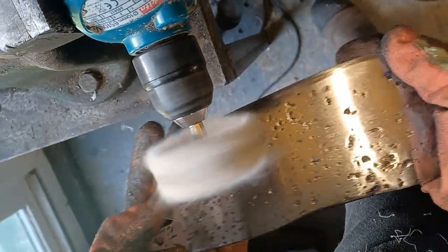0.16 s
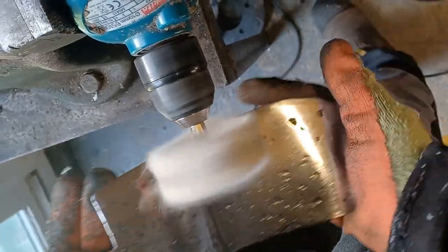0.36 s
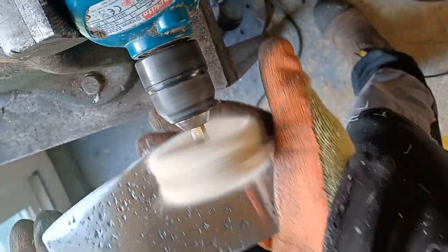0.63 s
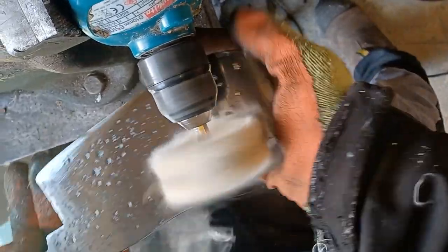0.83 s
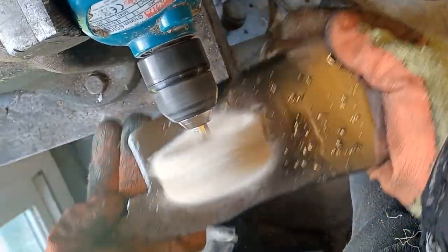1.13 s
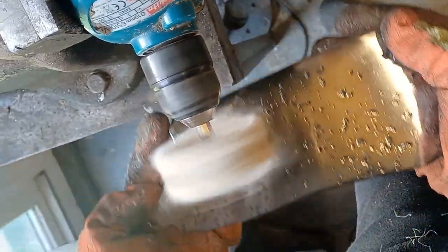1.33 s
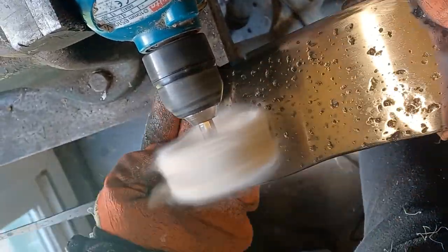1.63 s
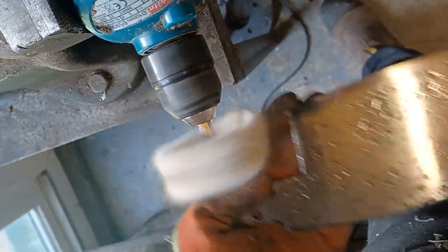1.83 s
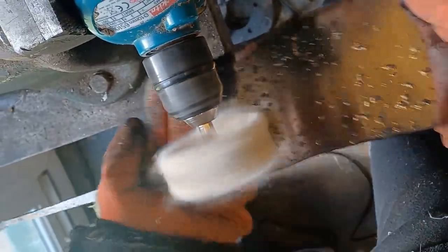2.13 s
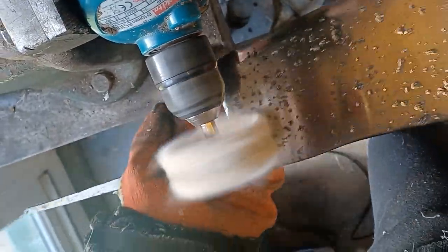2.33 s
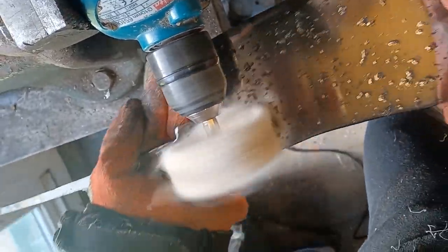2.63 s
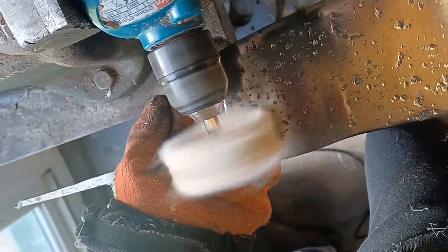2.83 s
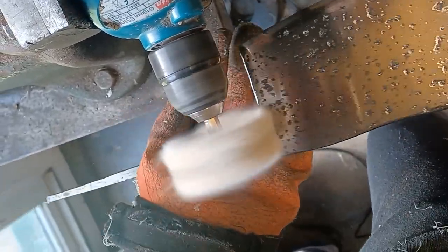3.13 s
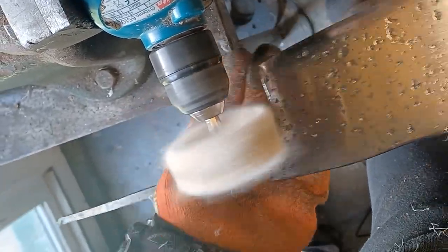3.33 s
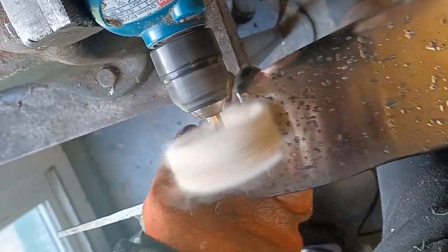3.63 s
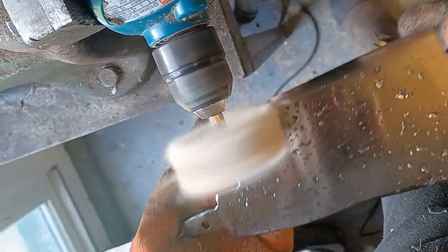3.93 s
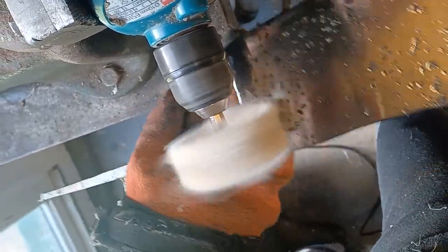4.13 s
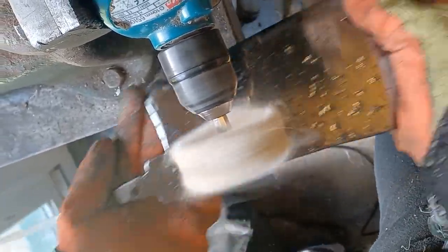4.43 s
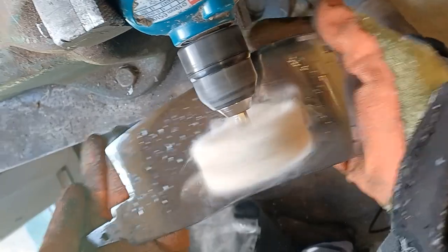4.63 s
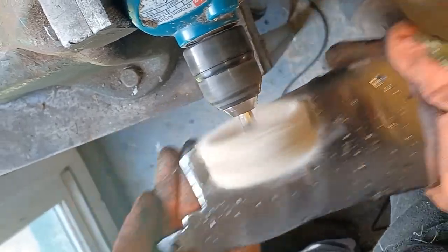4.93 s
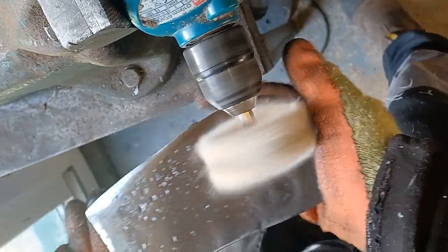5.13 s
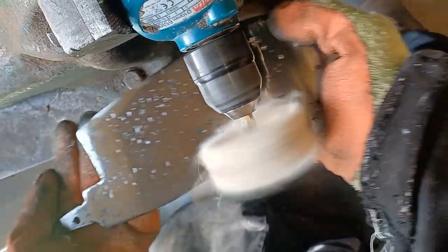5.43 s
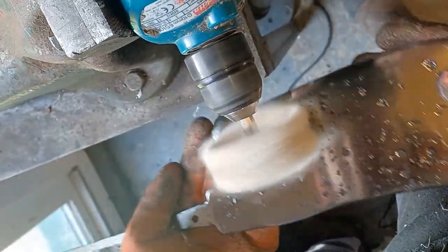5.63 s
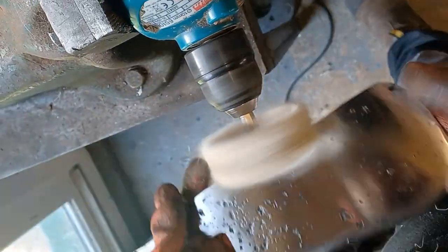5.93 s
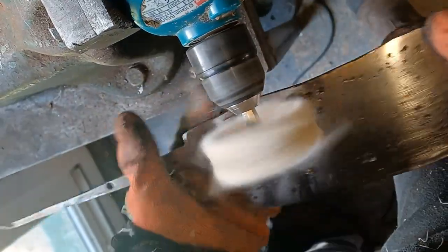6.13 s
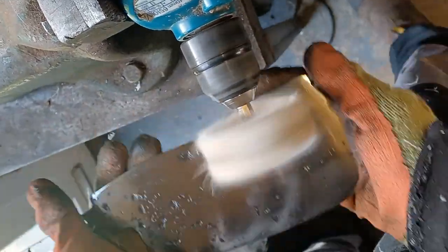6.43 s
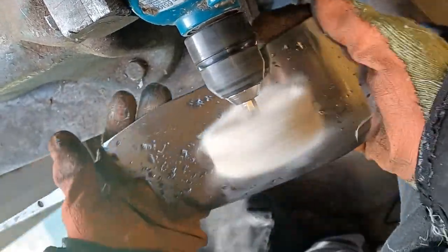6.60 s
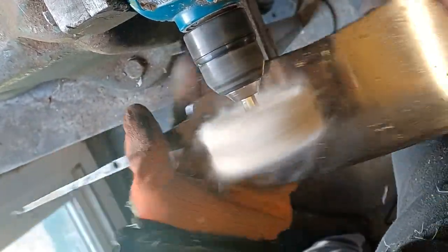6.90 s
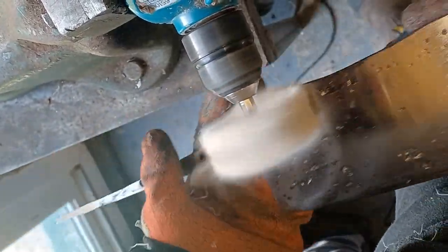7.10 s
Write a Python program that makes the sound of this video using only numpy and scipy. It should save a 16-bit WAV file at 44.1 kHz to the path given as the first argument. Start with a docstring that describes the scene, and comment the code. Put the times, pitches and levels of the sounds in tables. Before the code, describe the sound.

An electric drill whines high over gear roar and hiss, spinning a polishing mop against a steel blade while air buffets the microphone.

```python
"""A high motor whine sings over gear roar and fan hiss: a clamped electric drill spins a cloth
polishing mop against a steel blade, close to a two-port microphone. The pitch sags under load when
the blade is pressed on the mop, and the turning blade reflects the whine unevenly to the two ports.
Turbulent air thrown off by the drill buffets both with rumble, thumps and flutters, the right one
harder until it comes into shelter near the end."""
import sys
import numpy as np
from scipy import signal
from scipy.fft import rfft, irfft, next_fast_len
from scipy.io import wavfile
from scipy.ndimage import uniform_filter1d, map_coordinates

SR = 44100
rng = np.random.default_rng(int(sys.argv[2]) if len(sys.argv) > 2 else 0)


def log_audio(samples):
    """Write samples as a 16-bit WAV file to the path given in sys.argv[1]."""
    # one column per channel
    frames = np.atleast_2d(samples).T
    # limit to full scale, then quantise
    limited = np.clip(frames, -1, 1)
    pcm = np.round(limited * 32767).astype(np.int16)
    wavfile.write(sys.argv[1], SR, pcm)


N = 320166

# Motor speed, sagging under the blade's load. Each row: time in seconds, whine pitch in Hz.
MOTOR_PITCH = [(0.0, 7165), (0.19, 7135), (0.49, 7220), (0.89, 7204), (1.06, 7150), (1.27, 7160),
               (1.45, 7072), (1.59, 7098), (1.72, 7078), (1.8, 6970), (1.866, 6640), (1.89, 6620),
               (2.0, 7050), (2.07, 7180), (2.22, 7200), (2.37, 7150), (2.58, 7064), (2.8, 7068),
               (2.96, 7040), (3.332, 7034), (3.365, 6880), (3.45, 6805), (3.47, 6740), (3.54, 6925),
               (3.6, 6920), (3.635, 6848), (3.68, 6908), (3.73, 6862), (3.76, 6868), (3.84, 6945),
               (3.9, 7055), (3.96, 7140), (4.01, 7184), (4.11, 7180), (4.22, 7204), (4.42, 7146),
               (4.65, 7192), (4.76, 7114), (4.96, 7086), (5.18, 7204), (5.36, 7218), (5.54, 7204),
               (5.7, 7238), (5.92, 7370), (6.14, 7412), (6.42, 7292), (6.53, 7268), (6.77, 7116),
               (6.95, 7146), (7.12, 7136), (7.26, 7084)]
def motor_phase():
    """Phase is the integral of frequency; the rotor's inertia rounds every change of speed."""
    pitch = uniform_filter1d(curves(MOTOR_PITCH)[0], size=1000)
    return 2 * np.pi * np.cumsum(pitch) / SR


# The whine's fundamental. Each row: time in seconds, left and right level in dB.
WHINE_LEVEL = [(0.0, -28.0, -26.0), (0.1, -29.0, -24), (0.27, -26, -20.5), (0.34, -32.5, -20.5),
               (0.5, -25, -20.0), (0.66, -35, -20), (0.74, -45.0, -23), (0.86, -45.0, -19),
               (0.9, -44.5, -23), (0.96, -35, -21), (1.29, -23, -17), (1.38, -28, -21), (1.66, -25, -17.5),
               (1.78, -30, -17.5), (1.87, -22, -28), (2.05, -38, -19), (2.11, -31, -21),
               (2.19, -24.5, -21.5), (2.36, -34.0, -14), (2.45, -31.5, -26), (2.53, -30.0, -14.5),
               (2.62, -29, -21.0), (2.87, -38, -21), (2.92, -42.5, -17.5), (3.08, -32, -18),
               (3.3, -28, -20.5), (3.4, -28, -22), (3.48, -27, -20), (3.56, -27, -24), (3.75, -30.5, -22),
               (3.81, -31, -20), (3.87, -37, -18.5), (4.08, -27, -18), (4.55, -55, -16.0),
               (4.7, -33.5, -18), (4.78, -48, -20.5), (4.96, -25, -16.5), (5.16, -39, -20.0),
               (5.39, -26.5, -17), (5.45, -24.5, -18.5), (5.54, -34.0, -16), (5.87, -24.5, -16),
               (6.07, -36.0, -24), (6.14, -26, -22), (6.31, -21, -14.5), (6.6, -40, -15.5),
               (6.67, -41.5, -19), (6.79, -28, -28), (6.9, -39, -32), (7.01, -24, -23), (7.15, -30, -26),
               (7.26, -25, -22)]
# Its octave. Each row: time in seconds, left and right level in dB.
OCTAVE_LEVEL = [(0.0, -30, -19), (0.35, -24.5, -24.5), (0.51, -31.5, -23.5), (0.73, -24.0, -24),
                (0.93, -28.5, -21), (1.0, -23.5, -25.0), (1.09, -29.5, -23.0), (1.22, -23.0, -24),
                (1.45, -25, -26), (1.52, -36, -36), (1.63, -24, -38.5), (1.71, -29, -27), (2.44, -24, -24),
                (2.55, -27.0, -26), (2.85, -30.5, -25), (2.97, -27, -27), (3.29, -26, -27),
                (3.58, -29, -27), (3.69, -35, -22), (3.88, -27, -27), (4.02, -28.0, -21), (4.17, -25, -27),
                (4.38, -24, -26), (4.66, -34.5, -26.0), (4.77, -28, -27), (4.88, -27, -29.5),
                (5.06, -32.5, -27.0), (5.3, -27, -33), (5.38, -27, -45.0), (5.45, -30.0, -45.0),
                (5.49, -29, -36.0), (5.79, -27.5, -27.0), (5.87, -29.0, -36.0), (5.93, -30.5, -26),
                (6.14, -28.5, -35.0), (6.22, -35.5, -29.0), (6.34, -36.5, -27.0), (6.4, -30.5, -28.0),
                (6.49, -34.5, -33.0), (6.56, -32.5, -25.0), (6.64, -28.5, -30.5), (6.88, -28, -27.0),
                (6.98, -31.5, -30.5), (7.14, -25, -25.0), (7.26, -28.0, -26.5)]
# Phase lead of the right port. Each row: time in seconds, whine and octave lead in radians.
RIGHT_LEAD = [(0.0, 2.6, 2), (0.85, 2.4, 2.1), (1.0, 4.1, 2), (1.35, 4.1, 2.2), (1.5, 2.9, 2.4),
              (1.76, 3.1, 1.3), (1.87, 5.2, 1.6), (2.0, 3.4, 1.1), (2.2, 0.5, 2.1), (2.4, 3.1, 1.4),
              (3.4, 3.4, 1.2), (3.8, 3.8, 0.5), (3.9, 7.3, 0.7), (4.4, 5, 1.3), (4.9, 2.6, 0),
              (5.2, 5.8, -0.3), (5.9, 6.8, 0.3), (6.6, 6.3, 0.6), (6.8, 3.8, .6), (6.92, 7.2, 1.4),
              (7.12, 7.3, 1.2), (7.26, 8.8, 1)]
def whine(phase):
    """Reflection off the moving blade changes the path to each port, shifting level and phase."""
    whine_lead, octave_lead = curves(RIGHT_LEAD) + [[.4], [.25]] * wobble(5.8)
    whine_db = curves(WHINE_LEVEL) - 0.44 * wobble(11)  # the tones waver as the hands move
    octave_db = curves(OCTAVE_LEVEL) + 2 * wobble(11)
    fundamental = tone(whine_db + 1.6 * wobble(30), phase + [[0], [1]] * whine_lead)
    octave = tone(octave_db + 1.6 * wobble(30), 2 * phase + [[0], [1]] * octave_lead)
    return fundamental + octave


# Weaker rotor and gear tones. Each row: multiple of the whine's pitch, left and right level in dB.
ROTOR_ORDERS = [(0.125, -53, -55), (0.25, -47, -48), (0.3225, -44, -49), (0.645, -49, -44),
                (0.75, -53, -52), (0.875, -47, -46), (0.897, -52, -51), (0.9675, -53, -41),
                (1.176, -53, -46), (1.2195, -49, -45), (1.29, -52, -45), (1.4275, -53, -45),
                (1.5, -46, -48)]
# The gear tone just above the whine. Each row: time in seconds, left and right level in dB.
GEAR_TONE_LEVEL = [(0, -48, -40), (1.3, -47, -41), (1.6, -45, -26), (2.1, -47, -42), (2.6, -44, -31),
                   (3.35, -43, -32), (3.6, -51, -42), (5, -48, -43), (7.26, -48, -44)]
def rotor_and_gear_tones(phase, gear_order=1.1975):
    """Parts geared together vibrate at constant multiples, or orders, of the motor's speed."""
    tones = np.zeros((2, N))
    for order, *db in ROTOR_ORDERS:
        level_db = np.array(db)[:, None] + 2.2 * wobble(3.5)
        tones += tone(level_db, order * phase + 1.4 * wobble(1.49))
    gear_db = curves(GEAR_TONE_LEVEL) + 1.9 * wobble(5.05)
    return tones + tone(gear_db, gear_order * phase + 0.85 * wobble(1.66))


# The aliased harmonic, which comes and goes. Each row: time in seconds, level in dB.
ALIAS_LEVEL = [(0, -46), (.18, -39), (.33, -48), (.5, -42), (.85, -39), (1, -52), (1.33, -50), (1.42, -41),
               (1.68, -40), (1.8, -54), (2.1, -52), (2.23, -41), (2.4, -52), (2.78, -50), (2.86, -41),
               (3.02, -38), (3.12, -52), (3.95, -52), (4.15, -41), (4.35, -48), (4.55, -43), (4.75, -52),
               (5.4, -50), (5.6, -42), (6.1, -42), (6.4, -47), (6.7, -46), (6.9, -39), (7.1, -40),
               (7.26, -48)]
def aliased_harmonic(phase, converter_hz=48000):
    """Aliasing: harmonic five exceeds half the converter's rate and folds down, rising as the whine sags."""
    folded_phase = 2 * np.pi * converter_hz * np.arange(N) / SR - 5 * phase
    return tone(curves(ALIAS_LEVEL) + 1.5 * wobble(9.9), folded_phase)


# Machine noise as the blade is turned. Each row: time in seconds, base level of roar and of hiss in dB.
NOISE_LEVEL = [(0.0, -27.5, -26.5), (0.3, -28.5, -25.5), (0.9, -27.5, -26), (1.27, -28, -26),
               (1.6, -27, -25), (1.87, -28, -25), (2.04, -28.5, -27.5), (2.25, -27.5, -25),
               (2.7, -27.5, -25.5), (3.05, -27, -24), (3.6, -28, -24), (3.96, -28, -26), (4.22, -26.5, -25),
               (4.47, -28.5, -25.5), (4.9, -27.5, -25), (5.49, -25.5, -23), (5.74, -27.5, -25.5),
               (5.96, -28, -27.5), (6.12, -26.5, -24.5), (6.26, -27, -26), (6.7, -27.5, -24.5),
               (7.26, -28, -26)]
# Spectrum of the gear roar. Each row: frequency in Hz, left and right relative gain in dB.
ROAR_SPECTRUM = [(300, -38, -26), (870, -21, -17), (1530, -4, -5.5), (1740, -0.5, 0), (2060, 1, -0.5),
                 (2520, 0.5, 2), (3100, 1, -2.5), (3520, -1.5, -2), (4100, -1, 3.5), (4960, 1, 0),
                 (5900, -7, 2), (6740, -6, -9), (8100, -22.5, -12.5)]
# Spectrum of the fan hiss. Each row: frequency in Hz, left and right relative gain in dB.
HISS_SPECTRUM = [(4530, -24, -38.5), (5780, -9, -9.5), (6740, 2, 2), (6620, 2.5, 6), (7620, 0, 2.5),
                 (8300, -2, 1.5), (9000, 1.5, 1), (9750, 4, 0), (10640, -2, 1.5), (11700, -1, -3.5),
                 (12700, -1.5, -4.5), (13500, -2, -5.5), (14300, 0.5, -1.5), (15500, -7, -8),
                 (17000, -19, -12)]
def gear_roar_and_fan_hiss():
    """Broadband noise from gears and cooling fan is stronger at the right port, which faces the drill."""
    roar_db, hiss_db = curves(NOISE_LEVEL)
    shake_db = 0.36 * wobble(9, channels=1)  # unsteady hands move both levels together
    roar_gain = amp(roar_db + [[0], [3]] + shelter(-1) + 0.33 * wobble(4.7) + shake_db)
    hiss_gain = amp(hiss_db + [[1.8], [6]] + shelter(-3.5) + 0.52 * wobble(6.2) + shake_db)
    roar = roar_gain * textured_noise(ROAR_SPECTRUM, correlation=0.34, patch_db=0.27, rib_db=2.5)
    hiss = hiss_gain * textured_noise(HISS_SPECTRUM, correlation=0.033, patch_db=1.3, rib_db=1.5)
    return roar + hiss


# The machine's rush. Each row: time in seconds, level in dB.
RUSH_LEVEL = [(0, -31), (.7, -36.5), (1.4, -37), (2.1, -42), (2.7, -38), (3.5, -46), (4.4, -36.5),
              (5.2, -48), (6, -54), (6.6, -41), (6.85, -38.5), (7.26, -38)]
# Its spectrum. Each row: frequency in Hz, left and right relative gain in dB.
RUSH_SPECTRUM = [(150, -31, -29), (400, 3, -12), (800, -2, -2), (1420, -9, -2.5), (2200, -14, -19),
                 (8000, -48, -54)]
def machine_rush():
    """A band of noise in the lower midrange swells and ebbs by slow amplitude modulation."""
    noise = textured_noise(RUSH_SPECTRUM, correlation=0.4, patch_db=2.3, rib_db=2.5)
    return amp(curves(RUSH_LEVEL)) * noise


# The steady stream of air on the right port. Each row: time in seconds, level in dB.
RIGHT_STREAM = [(0.0, -21), (0.3, -20.5), (0.37, -18.5), (0.5, -18.5), (0.6, -17.5), (0.74, -18),
                (0.8, -20), (1.08, -20), (1.17, -18.5), (1.23, -21), (1.62, -19), (1.71, -21), (1.91, -21),
                (1.98, -15), (2.05, -19), (2.3, -20.5), (2.48, -19), (2.55, -24.5), (2.63, -20),
                (2.76, -22.5), (3.22, -21.5), (3.38, -24), (3.43, -19.5), (3.52, -22), (3.59, -20.5),
                (3.83, -20.5), (3.9, -22), (4.17, -19.5), (4.24, -21.5), (4.31, -18), (4.49, -23.5),
                (4.54, -18.5), (4.6, -25), (4.66, -20.5), (4.8, -25), (4.88, -21.5), (5.06, -23.5),
                (5.15, -21.5), (5.22, -22), (5.38, -19), (5.52, -21.5), (5.555, -19), (5.59, -25),
                (5.63, -20), (5.69, -22), (5.74, -21), (5.79, -25), (5.84, -20), (5.92, -23), (5.96, -19),
                (6.01, -23.5), (6.12, -19.5), (6.22, -21), (6.31, -19.5), (6.35, -23), (6.39, -17),
                (6.44, -21), (6.49, -19.5), (6.72, -21.5), (7.26, -29)]
# Port response, with two cavity humps. Each row: frequency in Hz, left and right relative gain in dB.
PORT_SPECTRUM = [(20, -47, -48), (45.3, -48, -63), (93.4, -22.5, -21), (160.6, -1.5, -3.5), (244, 2, 2),
                 (370, -3, -4), (450, 1, 1), (602, -1.5, -7), (970, -13.5, -17.5), (1570, -12.5, -21),
                 (3000, -30.5, -26.5), (8000, -17, -35.5)]
def buffeting(calm_left_db=-38):
    """Turbulent pressure excites the port cavities: large eddies rumble, small ones flutter."""
    large, small = eddies(), eddies()
    pressure = small + uniform_filter1d(large - small, size=60)  # lows from large, highs from small
    stream = unit(coloured(pressure, PORT_SPECTRUM))
    steady = amp([np.full(N, calm_left_db), curves(RIGHT_STREAM)[0]] + shelter(-16.5))
    unsteadiness = amp([[1.5], [.8]] * wobble(12) + 0.94 * wobble(36))
    return (steady + gusts()) * unsteadiness * stream


def eddies(sharp_per_s=60, sharp_db=4, sharp_s=0.0031, ceiling=2.9):
    """Turbulence is intermittent: noise comes in smooth lumps and sudden bursts of limited strength."""
    lumps = amp(0.7 * wobble(25) + 2.8 * wobble(160))
    arrivals = rng.random((2, N)) < sharp_per_s / SR
    window = np.hanning(round(sharp_s * SR))[None]
    bursts = amp(sharp_db) * signal.fftconvolve(arrivals, window, 'same', axes=1)
    return ceiling * np.tanh((lumps + bursts) / ceiling) * rng.standard_normal((2, N))


# Gusts on a sheltered port. Each row: start and length in seconds, port (0 left, 1 right), level in dB.
GUST_EVENTS = [(0.03, 0.4, 0, -30), (0.5, 0.097, 0, -33), (0.655, 0.28, 0, -27), (0.96, 0.064, 0, -21),
               (1.135, 0.34, 0, -26.5), (1.508, 0.36, 0, -31), (2.013, 0.51, 0, -26.5),
               (2.514, 0.15, 0, -38), (2.89, 0.25, 0, -31), (3.177, 0.19, 0, -27), (3.522, 0.11, 0, -32),
               (3.842, 0.16, 0, -27.5), (4.03, 0.42, 0, -23.5), (4.49, 0.13, 0, -35), (4.675, 0.13, 0, -33),
               (4.79, 0.091, 0, -24), (4.92, 0.051, 0, -25), (5.12, 0.2, 0, -33), (5.295, 0.13, 0, -24),
               (5.557, 0.11, 0, -26.5), (5.702, 0.12, 0, -38), (5.812, 0.12, 0, -25),
               (5.95, 0.22, 0, -28.5), (6.26, 0.043, 0, -18), (6.571, 0.074, 0, -19), (6.695, 0.14, 0, -32),
               (6.855, 0.085, 0, -22), (7.004, .26, 0, -28), (6.872, 0.066, 1, -26),
               (7.005, 0.082, 1, -24.5), (7.118, 0.046, 1, -19), (7.208, 0.043, 1, -26)]
def gusts(edge_s=0.087):
    """The pressure envelope of each gust rises and falls as the square of a linear ramp."""
    envelope = np.zeros((2, N))
    for start, length, port, db in GUST_EVENTS:
        first = max(round((start - edge_s / 2) * SR), 0)
        last = min(round((start + length + edge_s / 2) * SR), N)
        t = np.arange(first, last) / SR
        ramp = np.clip(np.minimum(t - start, start + length - t) / edge_s + .5, 0, 1)
        envelope[round(port), first:last] += amp(db) * ramp ** 2
    return envelope


# Single strong eddies. Each row: time in seconds, port (0 left, 1 right), relative level in dB.
THUMP_EVENTS = [(.174, 1, 0), (.237, 0, -4), (.359, 1, 9.5), (0.384, 1, 3), (.416, 0, -2), (0.543, 1, -4),
                (.613, 1, 2), (0.805, 0, -3), (.84, 1, 8.5), (1.045, 1, 0), (1.152, 1, 2), (1.303, 1, 1),
                (1.376, 1, 1), (1.478, 1, 5), (1.6, 1, 2), (1.85, 1, 10), (2.098, 1, 3), (2.154, 1, 7),
                (2.217, 1, 3), (2.432, 0, 1), (2.445, 1, -4), (2.456, 1, 1), (2.476, 1, 8), (2.505, 1, 6),
                (2.579, 1, 5), (2.647, 1, 8.5), (2.684, 1, 2), (2.933, 1, 3), (3.0, 1, 7), (3.229, 0, -4),
                (3.3, 1, 4.5), (3.425, 1, 5), (3.568, 1, 8.5), (3.836, 1, 7), (3.933, 1, 6), (4.063, 1, 4),
                (4.245, 0, 0.5), (4.312, 1, -3), (4.4, 1, 6), (4.435, 1, 4), (4.465, 1, 2), (4.556, 1, -3),
                (4.693, 1, -1), (4.816, 0, -5), (5.143, 1, 5.5), (5.387, 1, 6), (5.457, 1, 2),
                (5.552, 1, 3), (5.62, 1, 3), (5.71, 1, 7), (5.751, 1, 4), (5.797, 1, 0), (5.847, 1, -1),
                (5.889, 0, -1), (5.955, 1, -1), (6.107, 1, 5), (6.19, 1, 2), (6.282, 0, -9),
                (6.381, 1, 2.5), (6.466, 1, -1), (6.488, 1, 1.5), (6.557, 1, -1), (6.602, 0, -9),
                (6.649, 1, -1), (6.708, 1, -8), (7.025, 0, -2)]
# Their spectrum, crisper than the stream's. Each row: frequency in Hz, left and right gain in dB.
THUMP_SPECTRUM = [(20, -48, -45), (90.5, -20, -19), (234, 8, -0.5), (500, -1, 0), (980, -5, -11),
                  (1800, -9, -22), (4000, -33, -36)]
def thumps():
    """A strong eddy draws an impulse response from the port: a dip in pressure, then a push."""
    impulses = np.zeros((2, N))
    for time, port, db in THUMP_EVENTS:
        impulses[round(port), round((time - .0015) * SR)] = -amp(db + 19.0)
    return coloured(impulses, THUMP_SPECTRUM)


# Short flutters on the ports. Each row: centre in seconds, relative level in dB, pitch in Hz,
# left over right in dB, half-width in milliseconds.
FLUTTER_EVENTS = [(.418, -17, 770, -20, 1.6), (.918, -16, 680, -20, 1.6), (.948, -17.5, 890, -22, 1.6),
                  (1.001, -20, 760, -20, 1.6), (1.177, -22, 1150, -22, 1.5), (1.254, -19, 1340, 14, 1.4),
                  (1.266, -30, 650, -18, 1.6), (1.537, -23, 700, -20, 1.6), (1.849, -20, 620, -15, 1.3),
                  (2.089, -25, 810, 14, 1.6), (2.196, -21, 710, -20, 1.6), (2.212, -19, 900, 14, 1.7),
                  (2.407, -18, 700, -20, 1.6), (2.503, -22, 883, -14, 1.6), (2.718, -20, 780, -20, 1.6),
                  (3.179, -20, 680, -21, 2), (3.227, -12.5, 770, -10, 1.9), (3.469, -20, 810, -22, 1.6),
                  (3.662, -19, 750, -20, 1.8), (3.701, -22, 900, -23, 2), (4.168, -22, 920, 14, 1.6),
                  (4.203, -17, 740, -20, 1.6), (4.229, -19, 780, 16, 1.6), (4.39, -20, 860, 14, 1.8),
                  (5.549, -14, 590, -13, 2.6), (5.796, -25, 620, -20, 1.6), (5.949, -22, 850, -22, 1.6),
                  (6.04, -8.5, 655, -19, 1.2), (6.351, -23, 650, -22, 1.8), (6.648, -22, 750, -20, 1.6),
                  (6.893, -42, 50, -13, 8), (7.047, -22, 810, 17, 1.6)]
def flutters():
    """Each flutter is a wave packet: a sine that swells and fades under a Gaussian envelope."""
    out = np.zeros((2, N))
    t = np.arange(-SR // 50, SR // 50) / SR
    for centre, db, hz, pan_db, width_ms in FLUTTER_EVENTS:
        packet = np.exp(-(1e3 * t / width_ms) ** 2) * np.sin(2 * np.pi * hz * t)
        gain = amp(db - 5.5 + np.array([[pan_db], [-pan_db]]) / 2)
        first = round((centre + t[0]) * SR)
        out[:, first:first + len(t)] += gain * packet
    return out


def shelter(change_db, at_s=6.76, takes_s=0.077):
    """Shadowing: the level change in dB as the right port alone comes into shelter."""
    ramp = np.clip((np.arange(N) / SR - at_s) / takes_s + .5, 0, 1)
    return np.array([[0], [change_db]]) * ramp


def textured_noise(spectrum, correlation, patch_db, rib_db):
    """Partly coherent stereo noise of rms 1, with broad patches and narrow ribs of random gain."""
    common, opposed = rng.standard_normal((2, N))
    angle = np.arccos(correlation) / 2
    noise = np.cos(angle) * common + np.sin(angle) * np.array([opposed, -opposed])
    cells = signal.stft(noise, nperseg=1024)[2]
    for depth_db, bins, frames in (patch_db, 12, 7), (rib_db, 2, 8):
        field = uniform_filter1d(rng.standard_normal(cells.shape[1:]), size=bins, axis=0)
        field = uniform_filter1d(field, size=frames, axis=1)
        cells *= amp(depth_db * field / field.std())
    return unit(coloured(signal.istft(cells, nperseg=1024)[1][:, :N], spectrum))


def coloured(x, spectrum):
    """Minimum-phase filtering of each channel by its column of (Hz, dB, dB) points."""
    size = 2 * next_fast_len(N // 2 + SR // 4)
    hz, *columns = np.transpose(spectrum)
    log_hz = np.log(np.fft.rfftfreq(size, 1 / SR) + 1)
    gain = amp([np.interp(log_hz, np.log(hz), db) for db in columns])
    cepstrum = irfft(np.log(gain), size)
    cepstrum[:, 1:size // 2] *= 2  # a one-sided cepstrum makes the filter causal
    cepstrum[:, size // 2 + 1:] = 0
    return irfft(rfft(x, size) * np.exp(rfft(cepstrum)), size)[:, :N]


def wobble(rate, channels=2):
    """Smooth random modulation: a spline through rate knots a second."""
    knots = rng.standard_normal((channels, N // 100))
    return np.array([map_coordinates(k, [np.arange(N) * rate / SR]) for k in knots])


def curves(rows):
    """Linear interpolation, one value per sample, of each column after the time."""
    times, *columns = np.transpose(rows)
    return np.array([np.interp(np.arange(N) / SR, times, column) for column in columns])


def tone(db, phase):
    """A sinusoid whose rms level is db."""
    return np.sqrt(2) * amp(db) * np.sin(phase)


def amp(db):
    """Amplitude ratio of a level in dB."""
    return 10 ** (np.asarray(db) / 20)


def unit(x):
    """Each channel normalised to rms 1."""
    return x / np.sqrt(np.mean(x ** 2, axis=-1, keepdims=True))


def scene():
    """Superposition of the drill's tones, its noise and the moving air at the two ports."""
    phase = motor_phase()
    tones = whine(phase) + rotor_and_gear_tones(phase) + aliased_harmonic(phase)
    return tones + gear_roar_and_fan_hiss() + machine_rush() + buffeting() + thumps() + flutters()


def record(dry, cutoff_hz=15750):
    """An ideal low-pass filter removes everything above the band limit."""
    size = next_fast_len(N + SR // 4)
    passband = np.fft.rfftfreq(size, 1 / SR) < cutoff_hz
    return irfft(rfft(dry, size) * passband, size)[:, :N]


dry = scene()
out = record(dry)
log_audio(out)
```